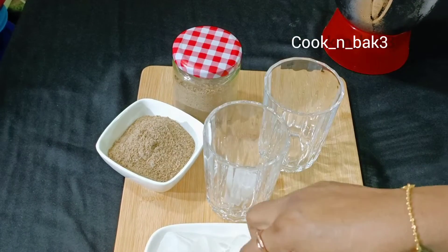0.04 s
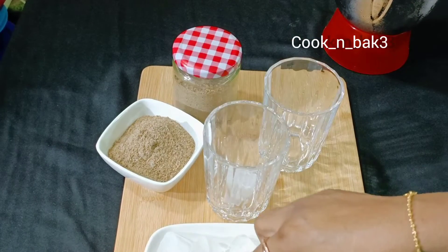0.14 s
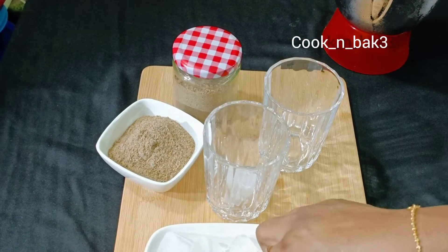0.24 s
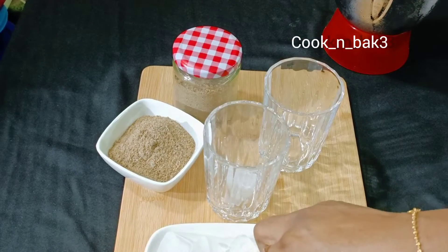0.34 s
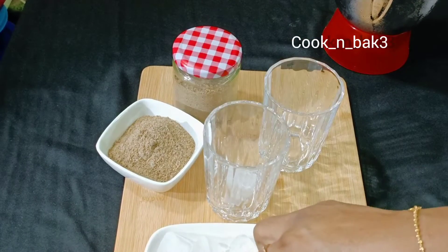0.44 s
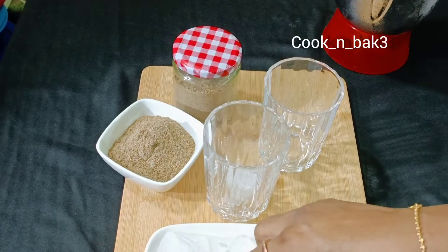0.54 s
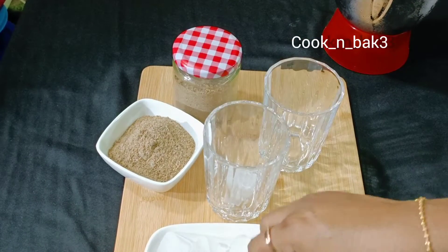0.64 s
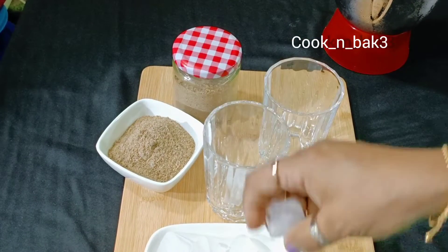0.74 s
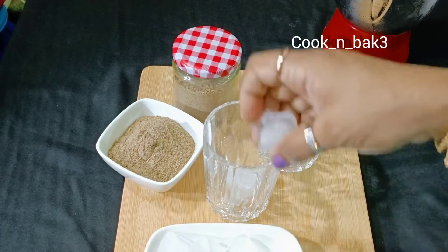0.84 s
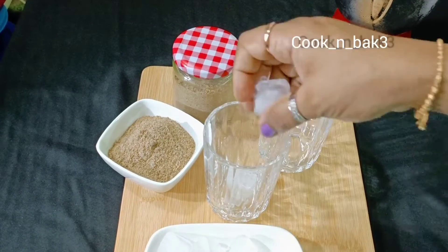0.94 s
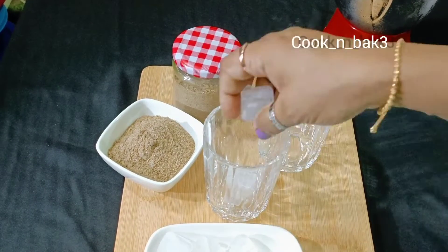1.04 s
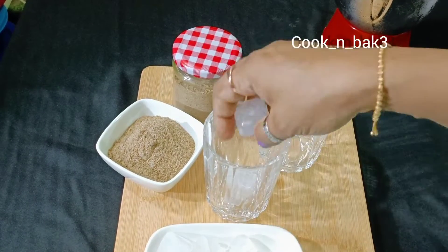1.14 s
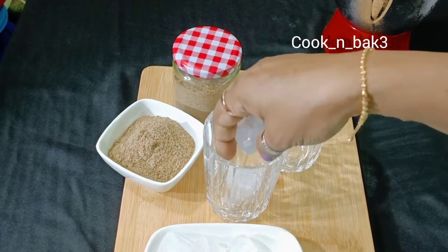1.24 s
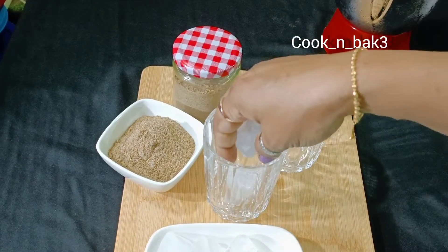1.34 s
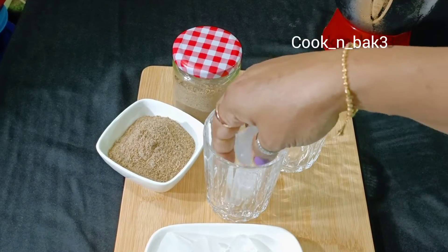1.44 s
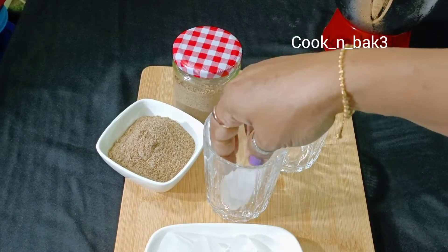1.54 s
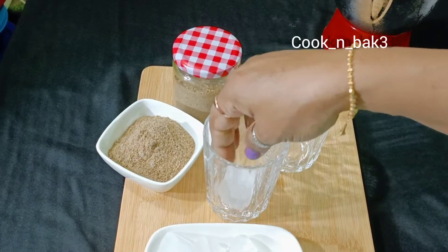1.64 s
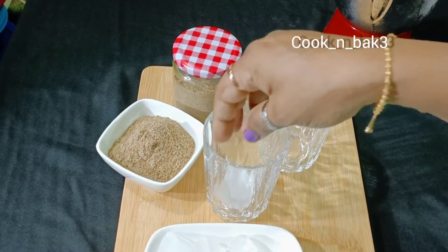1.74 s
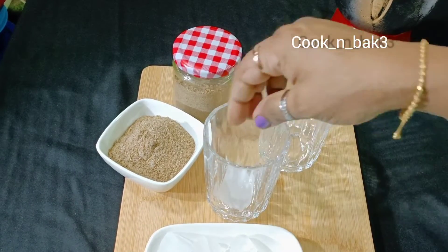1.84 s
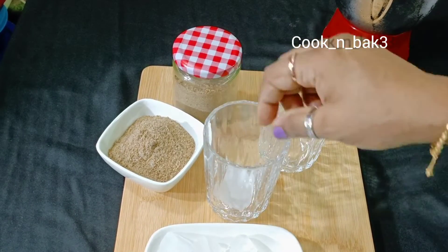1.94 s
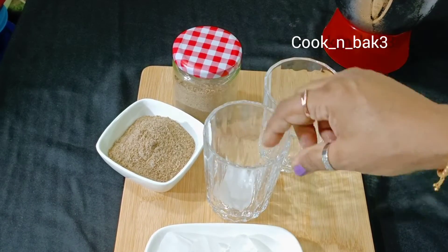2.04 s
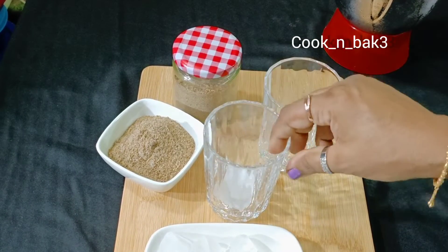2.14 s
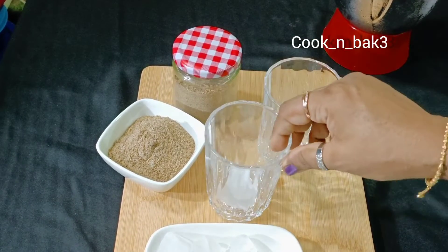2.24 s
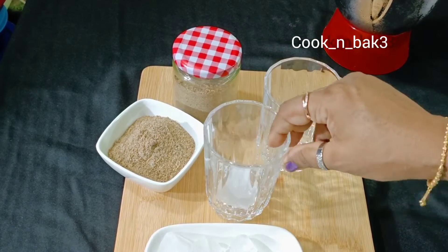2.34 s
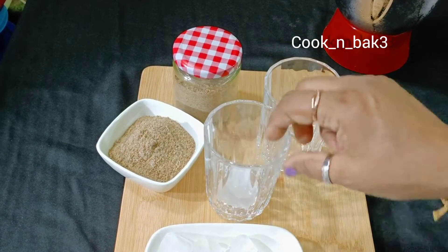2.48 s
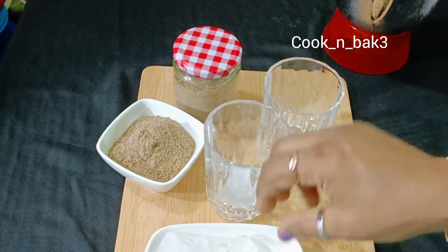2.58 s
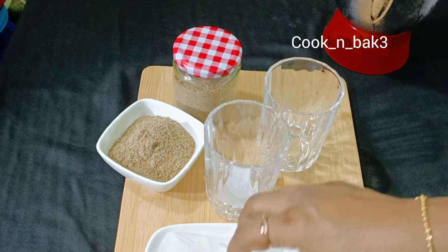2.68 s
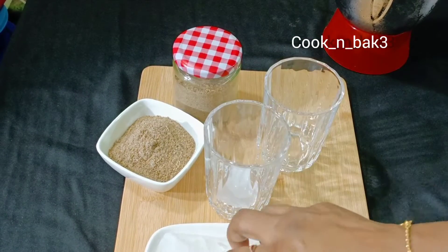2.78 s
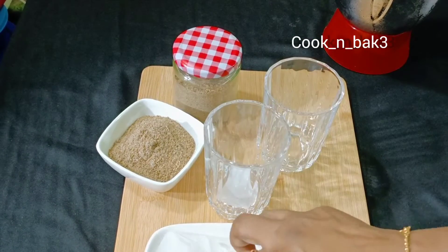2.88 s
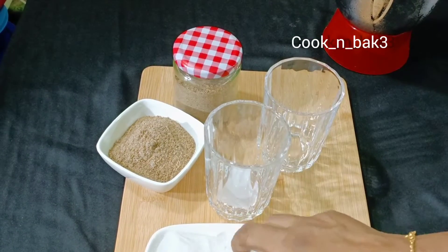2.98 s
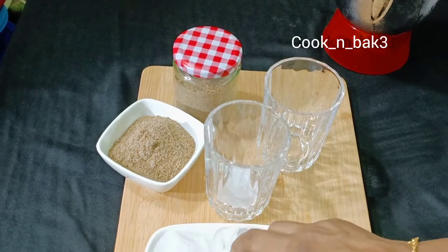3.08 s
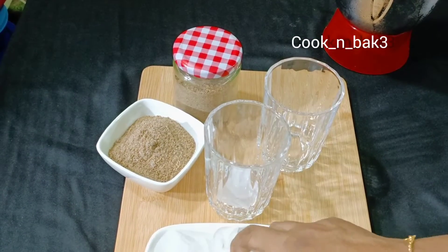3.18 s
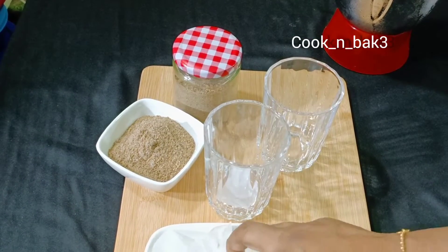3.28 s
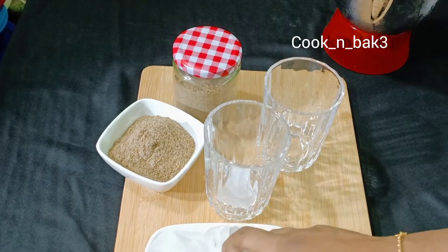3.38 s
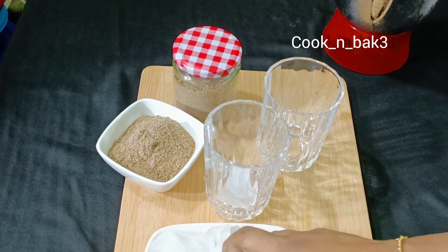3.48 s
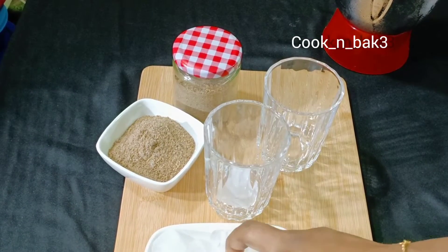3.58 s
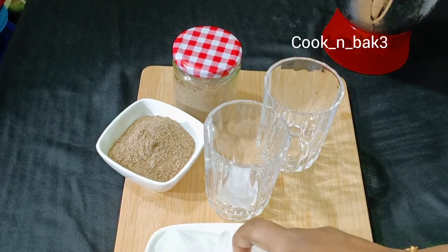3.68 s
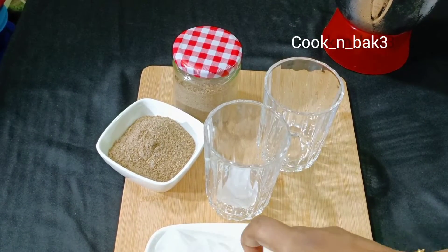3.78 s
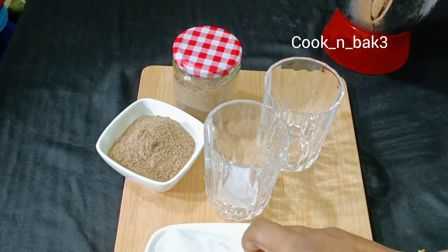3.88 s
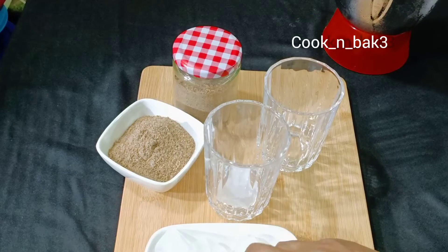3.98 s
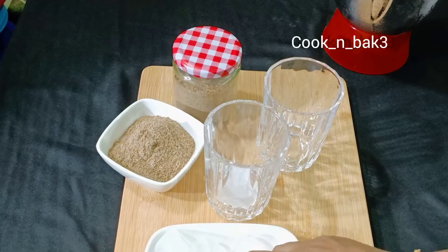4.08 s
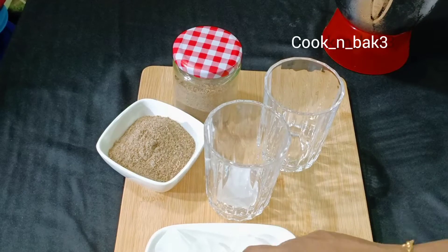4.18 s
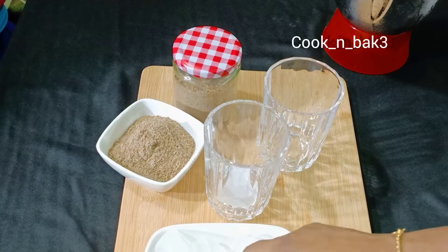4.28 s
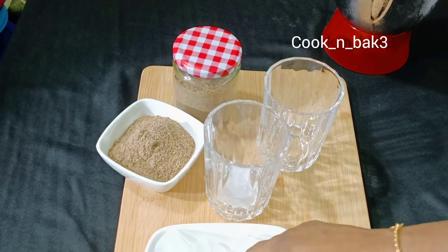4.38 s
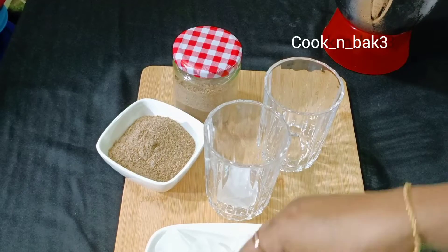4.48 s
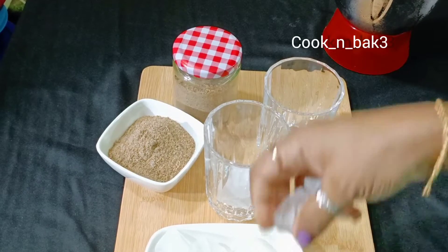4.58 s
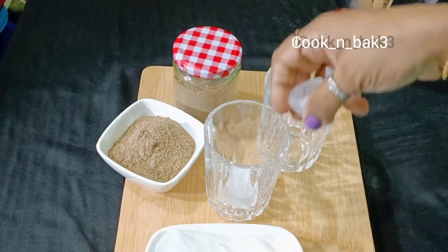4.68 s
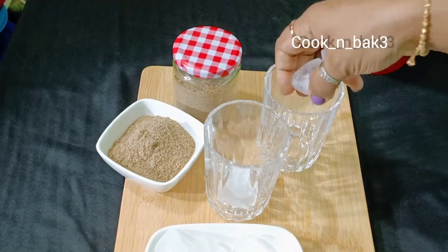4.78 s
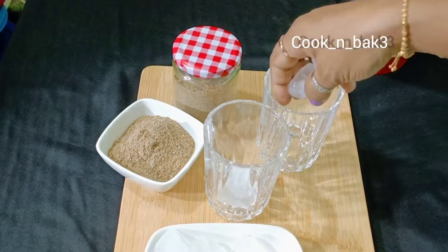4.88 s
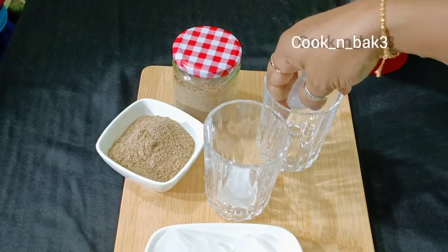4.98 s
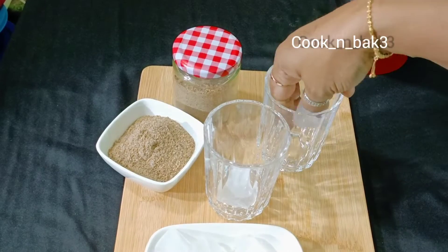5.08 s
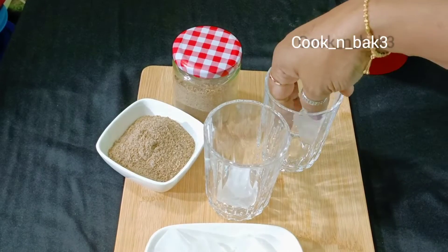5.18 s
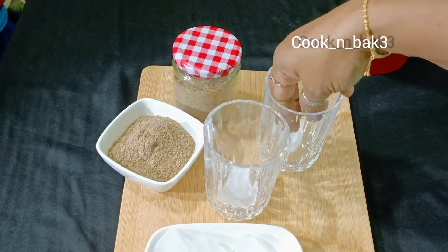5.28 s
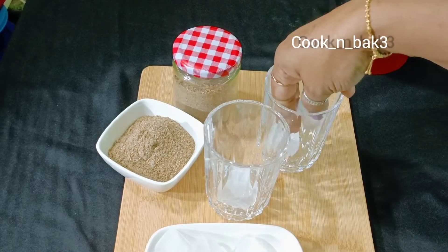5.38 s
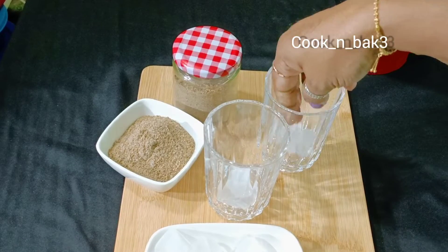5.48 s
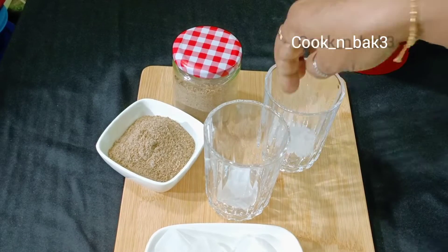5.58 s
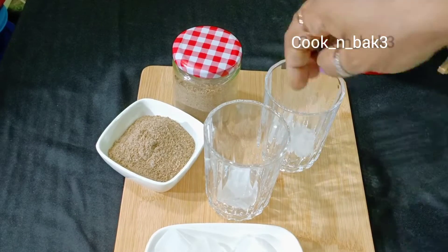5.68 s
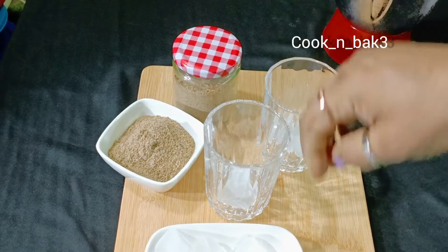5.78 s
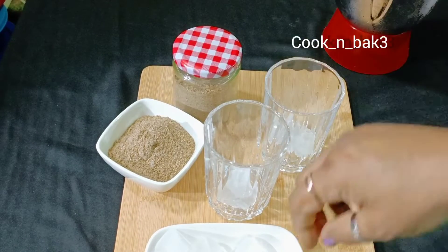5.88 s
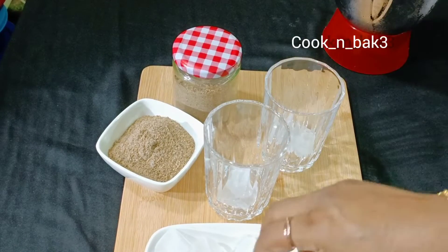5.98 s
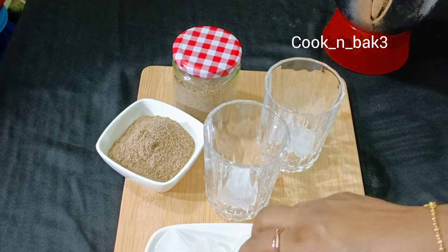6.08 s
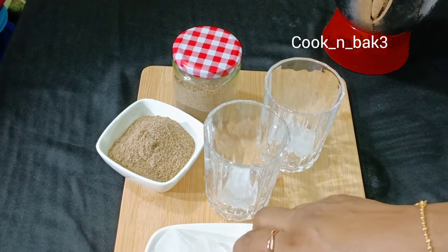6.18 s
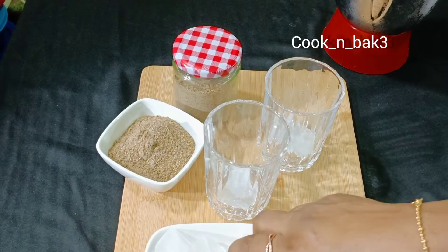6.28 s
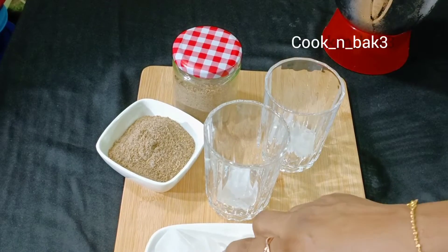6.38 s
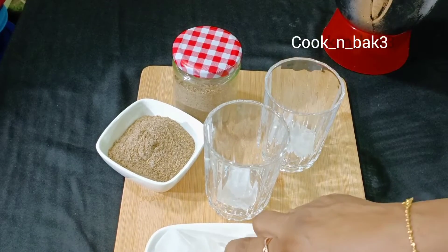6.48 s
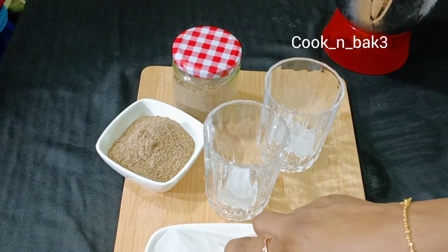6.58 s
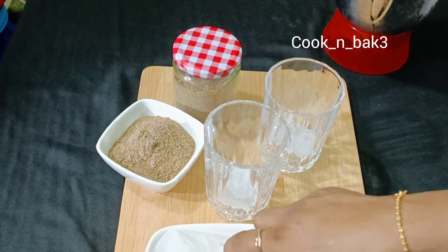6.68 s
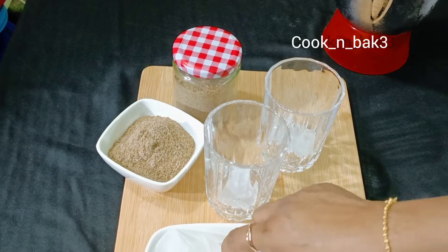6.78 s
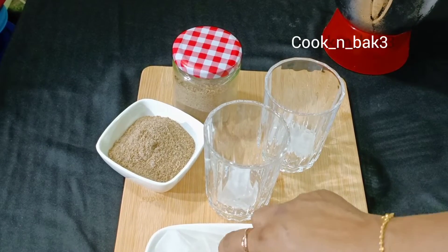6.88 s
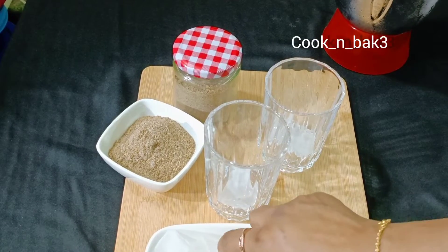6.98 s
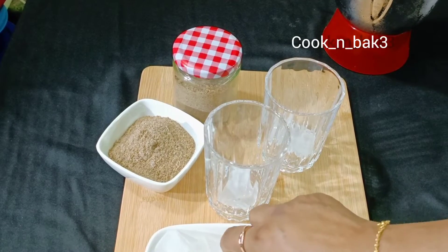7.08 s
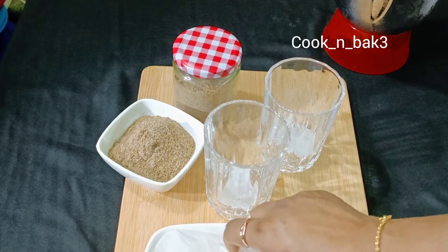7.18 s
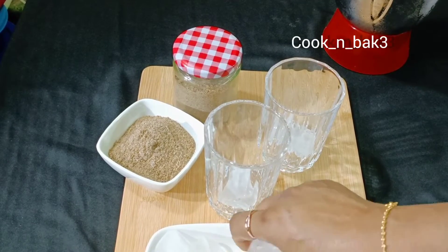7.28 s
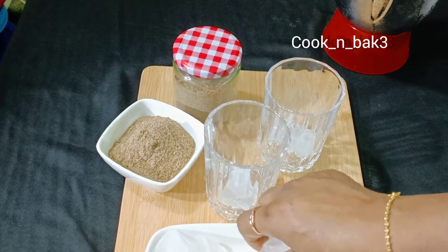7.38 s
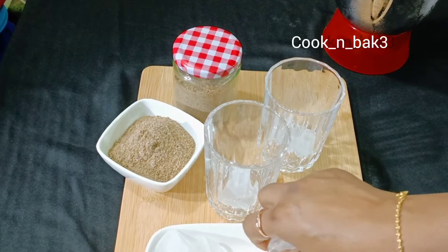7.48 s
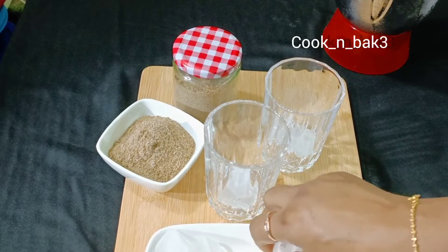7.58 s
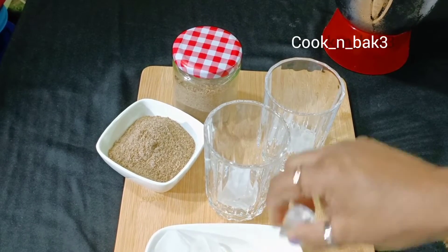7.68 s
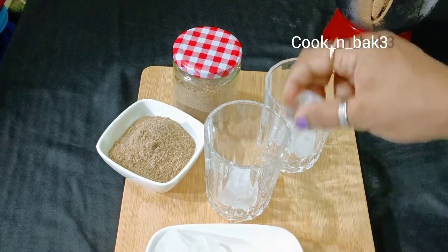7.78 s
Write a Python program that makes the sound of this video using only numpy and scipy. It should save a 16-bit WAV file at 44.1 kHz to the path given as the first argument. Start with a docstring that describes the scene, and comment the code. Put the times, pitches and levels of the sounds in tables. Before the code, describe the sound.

Close up, wet ice is picked from a dish with dry clicks, and single cubes crack and ring into glass tumblers over a faint low hum.

```python
"""A small kitchen with a low hum: ice cubes are fished out of a dish by hand and dropped into two glass
tumblers on a wooden board. Each blow cracks as a noise burst and rings decaying modes of cube, glass wall,
board and air column. In the dish the cubes click as coloured noise bursts and slide as grains and hiss
through wavering bands. Diffuse echoes follow, and two unlike microphone ports colour the near sounds."""
import sys
import numpy as np
from scipy import signal
from scipy.fft import rfft, irfft, next_fast_len
from scipy.io import wavfile
from scipy.ndimage import uniform_filter1d

SR = 44100
rng = np.random.default_rng(int(sys.argv[2]) if len(sys.argv) > 2 else 0)


def int16_out(signal):
    """Quantize to a 16-bit WAV file."""
    q = np.round(np.clip(np.atleast_2d(signal).T, -1, 1) * 32767)
    wavfile.write(sys.argv[1], SR, q.astype(np.int16))


N = 345458
SHORT, LONG = SR // 8, SR // 2   # lengths of a knock and of a wall ring, in samples
CONTACT_S, SWELL_S = 0.0018, 0.0023   # rise of a cube knock, rise of every other struck mode


def amp(db):
    """Decibels to a linear gain."""
    return 10 ** (np.asarray(db) / 20)


def rms_one(x):
    """Bring a signal to an RMS of 1."""
    return x / np.sqrt(np.mean(x ** 2) + 1e-20)


def at_hz(hz, points, column=1):
    """Read a table column at the given frequencies, straight lines over log frequency."""
    points = np.array(points)
    return np.interp(np.log(hz + 1), np.log(points[:, 0]), points[:, column])


def pan(x, db):
    """Left and right channels whose levels differ by db."""
    return x * amp([[db / 2], [-db / 2]])


def mode(hz, t60, size, rise):
    """A struck mode: a decaying sine that swells in over the moment of contact."""
    t = np.arange(size) / SR
    swell = np.sin(np.pi / 2 * np.minimum(t / rise, 1)) ** 2
    return np.sin(2 * np.pi * hz * t) * amp(-60 * t / t60) * swell


def burst(t60, noise):
    """Noise that dies away by 60 dB in t60 seconds."""
    return noise * amp(-60 * np.arange(noise.shape[-1]) / SR / t60)


def band(x, low_hz, high_hz):
    """Band-pass with gentle slopes."""
    return signal.sosfilt(signal.butter(2, [low_hz, high_hz], "band", fs=SR, output="sos"), x)


def add(out, s, x):
    """Mix a sound in at s seconds."""
    i = round(s * SR)
    out[..., i:i + x.shape[-1]] += x[..., :N - i]


def joined(curves):
    """Columns of several curves over all samples, fading to -110 dB around each."""
    padded = []
    for c in curves:
        padded.append([(c[0][0] - .05, -110, *c[0][2:]), *c, (c[-1][0] + .05, -110, *c[-1][2:])])
    s, *columns = np.concatenate(padded).T
    return [np.interp(np.arange(N) / SR, s, c) for c in columns]


def grains(per_s, spread_db):
    """Random clicks of uneven size and either sign."""
    size = amp(spread_db * np.minimum(rng.exponential(1, N), 4))
    return (rng.random(N) < per_s / SR) * size * rng.choice([-1, 1], N)


# spectrum of the hum, before it is brought to its level: f/Hz, level per Hz/dB
HUM_SPECTRUM = [(12, -40.5), (20, -12), (49, -1.5), (77, -13), (182, -10.5), (222, -16.5), (248, -15),
                (459, -17.5), (499, -20.5), (590, -22.5), (1150, -28.5), (1810, -37.5), (1960, -36),
                (5850, -54.5), (16000, -70.5)]
# level of the background, rough around the blows: t/s, level/dB
HUM_LEVEL = [(0.0, -57), (1.57, -60.5), (1.7, -55), (5.19, -61.5), (5.49, -52), (5.76, -57.5), (6.91, -60),
             (7.83, -57.5)]
# how alike the two channels are: f/Hz, likeness [0-1]
HUM_LIKENESS = [(40, 0.93), (300, .9), (700, 0.36), (2000, 0.19), (8000, .1)]
# left over right: f/Hz, L-R level/dB
HUM_BALANCE = [(40, 2), (300, -4), (1000, -1.5), (3000, -1.5), (6000, -12), (9000, 3.5)]


def hum():
    """Shaped noise at a roughly set, uneven level; the channels are most alike in the bass."""
    size = next_fast_len(N, real=True)
    hz = np.arange(size // 2 + 1) * SR / size
    mid, side = rfft(rng.standard_normal((2, size))) * amp(at_hz(hz, HUM_SPECTRUM))
    alike = at_hz(hz, HUM_LIKENESS)
    both = np.sqrt(1 + alike) * mid + np.sqrt(1 - alike) * side * [[1], [-1]]
    both = both * amp(at_hz(hz, HUM_BALANCE) * [[.5], [-.5]])
    level_db = np.interp(np.arange(N) / SR, *np.transpose(HUM_LEVEL))
    return amp(level_db) * rms_one(irfft(both, size)[:, :N])


# colour and length of the echoes: f/Hz, relative level/dB, t60/s
ROOM = [(284, -19, .25), (930, -10.5, 0.17), (3020, -17.5, 0.22), (5560, -21, 0.18), (10576, -13.5, 0.17)]


def kitchen(x):
    """Diffuse echoes after a 4 ms gap, dying band by band, different in each channel."""
    tail, white = 0, rng.standard_normal((2, 2, int(.5 * SR)))
    for k, hz in enumerate(200 * 2 ** np.arange(0, 6.5, .5)):
        t60 = at_hz(hz, ROOM, column=2)
        # neighbouring bands get unrelated noise; a longer tail is scaled down
        dying = burst(t60, white[k % 2]) / np.sqrt(t60 * SR / 14)
        tail = tail + amp(at_hz(hz, ROOM)) * band(dying, hz / 1.19, hz * 1.154)
    tail = np.pad(tail, ((0, 0), (int(.004 * SR), 0)))
    return signal.fftconvolve(x.mean(axis=0, keepdims=True), tail, axes=1)[:, :N]


# fingers on the front tumbler, one curve a stroke: t/s, level before panning/dB
STROKES = [
    [(1.1, -102), (1.316, -100.5), (1.47, -110)],
    [(2.09, -99), (2.134, -85), (2.182, -95), (2.554, -97), (2.65, -104)],
]


def stroked_wall():
    """Fingers stir the front tumbler: faint rubbing noise through its second wall mode."""
    [db], hz = joined(STROKES), FRONT_WALL[1][0]
    rub = rms_one(band(rng.standard_normal(N), hz - 25, hz + 25))
    return pan(amp(db) * rub, -6.5)


# wet ice and fingers sliding, one curve a movement: t/s, gain level/dB, centre f/Hz
SLIDES = [
    [(.05, -78, 5200), (.1, -76, 5170), (.152, -62.5, 2900), (.342, -69, 2600), (.45, -74, 3400),
     (.62, -64, 3370), (.748, -91, 3500), (.868, -73, 3310), (.958, -80, 3600)],
    [(1.85, -82, 2470), (1.938, -51.5, 3500), (2.006, -76, 4260), (2.05, -89, 2870)],
    [(2.75, -80, 2900), (2.884, -60.5, 4500), (2.984, -48.5, 3960), (3.17, -69, 3200), (3.27, -72, 2900)],
    [(3.34, -63, 2686), (3.39, -55.5, 2760), (3.442, -65, 5000), (3.51, -67.5, 4950), (3.53, -85, 3000),
     (3.592, -80, 2810)],
    [(3.722, -61.5, 3300), (3.858, -58.5, 4500), (3.962, -72, 3020), (4.018, -85, 4010), (4.082, -44, 3970),
     (4.128, -74.5, 3500), (4.4, -86, 3200)],
    [(4.776, -84, 3060), (4.89, -74.5, 3480), (5.018, -77, 3170)],
    [(6.19, -81, 4000), (6.388, -65.5, 4160), (6.514, -70, 4150), (6.7, -86, 3000)],
    [(6.85, -88, 2700), (6.934, -73, 3680), (7.06, -71.5, 2900), (7.15, -86.5, 3996), (7.19, -66, 5300),
     (7.22, -92, 5290)],
    [(7.25, -75, 4600), (7.31, -76, 4607), (7.37, -55.5, 4700), (7.458, -53, 3640), (7.494, -90, 4220)],
    [(7.69, -71, 5200), (7.72, -56, 5010), (7.83, -53.5, 4400)],
]
SLIDE_WIDTH, SLIDE_GRAINS_PER_S = .22, 1500   # width in log frequency
BROAD_DB, SLIDE_TOP_DB = -5.5, -4.5   # broad part and treble, re the centre
SQUEAK_DB = 6.5   # how far the narrow bands come and go (standard deviation)


def sliding():
    """Fine grains and hiss through narrow bands that waver and open around the moving centre."""
    db, centre_hz = joined(SLIDES)
    hiss = rng.standard_normal((3, N))
    grit = .9 * grains(SLIDE_GRAINS_PER_S, spread_db=4.0)
    rub = hiss[:2] + grit, hiss[1:] + grit
    out = amp(SLIDE_TOP_DB) * band(rub[0], 7500, 11000)
    steps = np.arange(0, N / SR + 1, .1)
    for k, hz in enumerate(np.geomspace(1300, 6300, num=24)):
        opening = amp(BROAD_DB) + np.exp(-np.log(hz / centre_hz) ** 2 / SLIDE_WIDTH ** 2)
        waver_db = np.interp(np.arange(N) / SR, steps, rng.normal(0, SQUEAK_DB, len(steps)))
        # within each channel, neighbouring bands get different hiss
        out = out + opening * amp(waver_db) * band(rub[k % 2], hz / 1.03, hz * 1.03)
    return amp(db) * out


# cube on cube or dish, long ones are wet scuffs: t/s, body peak level/dB, colour f/Hz,
# low part level/dB, treble part level/dB, L-R level/dB, t60/s
CLICKS = [(0.0933, -52.5, 3120, -69, -47.5, 5.5, .012), (0.134, -60, 5240, -33, -39, 7, 0.022),
          (.1645, -46, 2870, -48, -41, 5.5, 0.032), (0.225, -41.5, 2400, -33, -33, 12, 0.029),
          (.3377, -38, 2340, -50, -55, 6, 0.017), (0.3606, -38, 5200, -36, -29, 5, 0.017),
          (0.4595, -46, 2770, -53, -37, 1, 0.022), (.575, -58, 2420, -63, -42, 11, .043),
          (0.5912, -46, 3340, -36, -23.5, 8, 0.131), (0.613, -32.5, 3270, -37, -35, 1, 0.016),
          (0.7096, -34.5, 2760, -23, -23, 8, 0.042), (.727, -27, 4020, -54, -15, 8, 0.034),
          (0.8056, -28.5, 2873, -26, -22, -5, 0.014), (0.9337, -49.5, 4500, -36.5, -40, 5, 0.016),
          (1.9267, -51, 4011, -52.5, -53, -9, .076), (1.937, -63, 3610, -31, -45.5, -13, 0.011),
          (2.814, -42.5, 2110, -30, -26.5, -4, 0.017), (2.8645, -46.5, 3950, -50, -43, 5, .012),
          (2.8968, -50, 5910, -51, -34.5, -7, .012), (2.9166, -31.5, 3020, -52, -30, 8, 0.016),
          (2.9237, -40.5, 4094, -21, -11, -10, 0.011), (2.9637, -31, 4100, -39, -39, 2, 0.0091),
          (2.9789, -26.5, 2526, -13, -9.5, 4, 0.0049), (2.9967, -51, 3190, -51, -27, -15, 0.0076),
          (3.0088, -38, 3250, -46, -34, 1.5, 0.02), (3.0423, -38, 1943, -49, -25, 3.5, 0.014),
          (3.0576, -26.5, 2690, -45, -38, 2, 0.0073), (3.0899, -40, 2120, -19, -30, 5, 0.025),
          (3.1048, -39, 3300, -46, -46, 13, 0.014), (3.114, -47, 2750, -26, -31, -11, 0.028),
          (3.1264, -20.5, 2410, -14, -6, 2, 0.017), (3.1371, -47, 5030, -45, -34, -13, 0.0176),
          (3.1728, -36.5, 2949, -21, -45, 14, 0.014), (3.34, -50.5, 2780, -55.5, -56.5, 1, 0.08),
          (3.357, -44, 2810, -57, -49, 10, 0.01), (3.506, -50, 2960, -20.5, -47, 6, 0.017),
          (3.518, -52, 2120, -41, -56, -1, 0.013), (3.608, -68, 2292, -48, -63, 5.5, .012),
          (3.633, -65, 5019, -56, -52, 3, 0.013), (3.688, -42.5, 2800, -39.5, -42, 3, .02),
          (3.697, -35, 2830, -22, -25.5, 3.5, 0.017), (3.795, -38, 5930, -16, -9, 1, 0.012),
          (3.809, -37.5, 5600, -54, -28, 4, 0.026), (3.835, -29, 4347, -26, -25, 5, 0.0082),
          (3.9402, -72, 2040, -30.5, -52, 14, .013), (3.9555, -47.5, 3212, -36, -57.5, 5, 0.0185),
          (3.975, -43, 2905, -26, -60, 1, 0.013), (4.05, -45, 3200, -21, -55, 8, 0.0206),
          (4.058, -21, 4200, -7.5, -10.5, 2.5, 0.01), (4.0944, -33.5, 2240, -53, -19.5, 7, .017),
          (4.131, -42.5, 4460, -50, -29, -4, 0.0094), (6.2589, -37, 4600, -25.5, -27, -4, 0.017),
          (6.9348, -58.5, 3900, -41, -41, 2, 0.06573), (6.9892, -57.5, 5890, -35, -52.5, 3, 0.073),
          (7.1702, -84, 5800, -63.5, -38.5, 20, 0.08024), (7.4272, -44, 2280, -17.5, -21.5, 3, .014),
          (7.4554, -41.5, 2880, -27.5, -47, 12, 0.0157), (7.4822, -46, 4180, -52, -46, -2, 0.015),
          (7.4932, -42, 4238, -36, -33, 0.5, 0.013)]
UPPER_DB = -7   # upper mids re treble part


def dish_clicks():
    """Dry cracks and scuffs: noise bursts, each with its own colour and length."""
    out = np.zeros((2, N))
    for s, peak_db, hz, low_db, treble_db, side_db, t60 in CLICKS:
        onset = np.minimum(np.arange(4000) / (0.1 * t60 * SR + 1), 1)
        crack = burst(t60, rng.standard_normal(4000)) * onset
        crack /= np.sqrt(t60 / 0.0046)   # a longer contact spreads the same energy
        body = band(band(crack, 0.64 * hz, 1.515 * hz), 0.64 * hz, 1.515 * hz)
        low = band(crack, 1070, 2110)
        treble = amp(UPPER_DB) * band(crack, 3700, 7900) + band(crack, 6580, 19845)
        click = amp(peak_db) * body / np.abs(body).max() + amp(low_db) * low + amp(treble_db) * treble
        add(out, s, pan(click, side_db))
    return out


# heavier contacts thump the dish: t/s, level/dB
THUMPS = [(0.227, -47.5), (0.6152, -37), (.727, -44.5), (.8055, -41), (1.9254, -45.5), (2.9774, -38.5),
          (3.0436, -43), (3.0574, -35.5), (3.0922, -40.5), (3.116, -38), (3.1266, -35), (3.1368, -33.5),
          (3.1721, -39.5), (3.696, -45.5), (3.795, -42), (4.0574, -39.5), (4.0944, -41)]
DISH_HZ, DISH_T60_S = 427.4, 0.049


def dish_thumps():
    """The dull note of the dish: one short mode, its pitch a little different each time."""
    out = np.zeros((2, N))
    for s, db in THUMPS:
        hz = DISH_HZ * (1 + 0.043 * rng.standard_normal())
        add(out, s, amp(db) * mode(hz, DISH_T60_S, SHORT, SWELL_S))
    return out


# the cube skids and chatters in the tumbler between the clear blows: t/s, level/dB
RATTLE = [
    [(5.28, -73.5), (5.44, -64.5), (5.518, -30.5), (5.558, -60), (5.72, -86)],
]


def rattle():
    """Dense small contacts, broad in colour: random clicks through a wide band."""
    [db] = joined(RATTLE)
    return amp(db) * rms_one(band(grains(1200, spread_db=2.5), 1100, 12000))


# three multiples of the board note: multiple of the note, relative level/dB, t60/s
BOARD_MODES = [(.33, -15.5, 0.068), (.78, -8.5, 0.083), (1.0, 1, .09)]


def board_thump(note_hz):
    """The wooden board answers a blow with a few short modes."""
    return sum(amp(db) * mode(k * note_hz, t60, SHORT, SWELL_S) for k, db, t60 in BOARD_MODES)


AIR_T60_S = 0.089
AIR_SCATTER = 0.032   # the air notes differ by this share from blow to blow (standard deviation)
AIR_PAIR, AIR_PAIR_DB = 0.95, -3.5   # a second note lies just under the first: ratio, dB


def air_note(note_hz):
    """The air column in the tumbler sounds two close, short notes of uneven pitch and level."""
    out = 0
    for ratio, db in [(1, 0), (AIR_PAIR, AIR_PAIR_DB)]:
        pitch, level = rng.standard_normal(2)
        hz = ratio * note_hz * (1 + AIR_SCATTER * pitch)
        out = out + amp(db + 3.0 * level) * mode(hz, AIR_T60_S, SHORT, SWELL_S)
    return out


# knock of a cube, before scatter: f/Hz, relative level/dB, t60/s
CUBE_MODES = [(1630, -10, 0.014), (3324, 2.5, 0.018), (4200, -5.5, 0.016), (5312, -14, 0.03),
              (2700, -12, 0.029), (6380, -13, 0.018)]
# treble edge re crack level, front then back tumbler: level/dB
EDGE_DB = (-17.5, -3)
KNOCK_DB, CRACK_DB = -5.0, -1.5   # cube modes and broad crack, re crack level


def cube_crack(back):
    """The cube's own modes, a broad crack partly shared by the channels and a treble edge."""
    knock = 0
    for hz, db, t60 in CUBE_MODES:
        level, pitch = rng.standard_normal(2)
        knock = knock + amp(db + 3.1 * level) * mode(hz * (1 + 0.018 * pitch), t60, SHORT, CONTACT_S)
    shared, own = rng.standard_normal(800), rng.standard_normal((2, 800))
    out = np.tile(amp(KNOCK_DB) * knock, (2, 1))
    out[:, :800] += amp(CRACK_DB) * band(burst(0.019, shared + 0.53 * own), 810, 19845)
    out[:, :800] += amp(EDGE_DB[back]) * band(burst(0.01, own), 10500, 15000)
    return out


# wall modes of each tumbler, every one a close pair:
# f/Hz, split f/Hz, share of the upper [0-1], t60 when free/s, relative level/dB, L-R level/dB
FRONT_WALL = [(2448.5, 11, 0.2, 0.54, 0, -1), (5830, 29, 0.2, 0.25, 2, -7), (9664, 28, 0.36, .2, 16.5, 5),
              (10913, 20, 0.06, 0.2, 12, 4.5)]
BACK_WALL = [(2440, 18, 0.072, 0.12, 0.5, 0.0064), (5844, 27, 0.14, 0.2, -1, 0), (9900, 32, 0.37, .2, 5, 0),
             (10886, 20, .2, .25, 5, 0.016)]


def wall_ring(back, low_db, high_db, free, kept):
    """The glass wall rings in beating pairs of modes, lowered over time by the curve kept."""
    out = 0
    walls = BACK_WALL if back else FRONT_WALL
    for (hz, split, upper, t60, db, side_db), blow_db in zip(walls, (low_db, high_db, high_db, high_db)):
        lasts = t60 * max(free, .1)
        pair = (1 - upper) * mode(hz - upper * split, lasts, LONG, SWELL_S)
        pair += upper * mode(hz + (1 - upper) * split, lasts, LONG, SWELL_S)
        out = out + pan(amp(db + blow_db) * pair * kept, side_db)
    return out


# cube on tumbler: t/s, crack level/dB, low ring level/dB, high ring level/dB, board level/dB,
# air level/dB, share of free ring time [0-1]
CLINKS = [(1.5445, -25, -29.5, -34, -51.5, -49.5, 1), (1.5751, -10.5, -29, -14, -38.5, -30, 1),
          (1.5923, -23.5, -28, -41.5, -35.5, -28, 0.88), (1.6033, -24.5, -24, -43, -28.5, -39.5, 0.9),
          (1.6177, -34.5, -26, -44, -38.5, -40, 0.57), (1.6557, -26.5, -45, -44, -34.5, -60, 1),
          (1.6763, -47, -59.5, -72.5, -47, -43.5, 0.5), (2.2412, -81, -90, -95, -36.5, -75, .6),
          (2.272, -67, -62, -87, -63, -75, 0.25), (5.1417, -36, -30, -33, -47, -59, 0.2),
          (5.236, -53, -51, -56, -57, -66, 1), (5.2823, -9, -8.5, -52, -18.5, -25, 0.075),
          (5.2973, -20, -40.5, -51, -24.5, -20, 0.77), (5.3084, -19.5, -45, -56, -40, -21.5, 0.636),
          (5.3504, -19.5, -41, -52, -28.5, -52, 0.67), (5.3624, -23.5, -60.5, -65, -54, -48.5, .9),
          (5.3996, -36, -42.5, -70.5, -33, -34, 0.57), (5.4145, -32, -39.5, -62, -47, -40, .3),
          (5.4447, -27.5, -27.5, -28, -39, -42.5, 0.54), (5.4789, -16.5, -31, -39, -28.5, -32.5, 0.4),
          (5.5183, -24, -28, -20.5, -29, -33, 1), (5.531, -29, -30, -32, -34, -35, 1),
          (5.5395, -16, -12.5, -47.5, -24, -27.5, 1), (5.5528, -37, -26, -43, -33.5, -36, 0.33),
          (5.5638, -16, -31, -26, -25, -34, 0.99), (5.5819, -32, -25.5, -25.5, -42, -36, 0.56),
          (5.611, -29, -34, -34.5, -34.5, -41.5, 0.92), (5.6261, -28, -41, -54.5, -38, -39, .7),
          (5.6354, -30.5, -47, -58, -37.5, -47, .75), (5.671, -34.5, -56, -73, -42.5, -58, 0.95),
          (5.6835, -64, -52, -82.5, -66, -63, 1), (5.7221, -65, -51.5, -75, -49.5, -58, 1)]
# fingers or the leaning cube still the wall: t/s, level taken off/dB
DAMPINGS = [(1.92, 3.5), (1.969, 13), (5.271, 7.5), (5.582, 19.5), (5.636, 4.5)]
# what a contact takes off earlier ringing, front then back tumbler: level/dB (below 0 takes nothing)
MUFFLE_DB = (2, -1.5)
# front then back tumbler: board note f/Hz, air note f/Hz at first, air note f/Hz at rest,
# rise starts t/s, rise takes t/s
HOLLOW = [(300.73, 790, 960, 1.575, .03), (359.2, 790, 975, 5.42, 0.1616)]
SWAP_S = 3.0   # clinks before this are in the front tumbler, later ones in the back
AIR_LAG_S = 0.00014   # the air column reaches the left port later


def tumblers():
    """Each blow cracks, and rings wall, air column and board into separate knocks and wall rings."""
    out, rings, muffled_db = np.zeros((2, N)), np.zeros((2, N)), np.zeros(N + SR)
    # in the front tumbler each contact lowers earlier ringing; in the back only DAMPINGS do
    for s, muffle_db in [(s, MUFFLE_DB[s > SWAP_S]) for s, *_ in CLINKS] + list(DAMPINGS):
        muffled_db[round(s * SR):] += max(muffle_db, 0)
    for s, crack_db, low_db, high_db, board_db, air_db, free in CLINKS:
        back, start = s > SWAP_S, round(s * SR)
        add(out, s, amp(crack_db) * cube_crack(back))
        # only what is muffled after this blow counts, smoothed over 90 samples
        later_db = uniform_filter1d(muffled_db[start:start + LONG], size=90)
        kept = amp(muffled_db[start] - later_db)
        add(rings, s, wall_ring(back, low_db, high_db, free, kept))
        board_hz, first_hz, rest_hz, rise_s, takes_s = HOLLOW[back]
        add(out, s, amp(board_db) * board_thump(board_hz))
        # the sinking cube shortens the air column
        air_hz = np.interp(s, [rise_s, rise_s + takes_s], [first_hz, rest_hz])
        air = amp(air_db) * air_note(air_hz)
        add(out[0], s + AIR_LAG_S, air)
        add(out[1], s, air)
    return out, rings


def colour(x, db_of_hz, late_s):
    """Causal (minimum-phase) filter with the given dB response and a small delay."""
    size = 4096
    hz = np.arange(size // 2 + 1) * SR / size
    # folding the cepstrum forward gives the minimum phase
    cepstrum = irfft(np.log(amp(db_of_hz(hz))))
    cepstrum[1:size // 2] *= 2
    cepstrum[size // 2 + 1:] = 0
    response = np.exp(rfft(cepstrum) - 2j * np.pi * hz * late_s)
    return signal.oaconvolve(x, irfft(response)[:size // 2])[:N]


# the two microphone ports, for near sounds: f/Hz, left level/dB, right level/dB
PORTS = [(99.64, -6, -6.5), (370, -2.5, 0), (1060, -2, -5), (2304.7, -2.5, 4), (4860, -5, 4),
         (6000, -13, 9.5), (6606, -17.5, -4), (6897, -31.5, -20), (7270, -11.5, -33), (10700, -28.5, -40.5),
         (13846, -41.5, -44.5), (16130, -39.5, -38.5)]
LEFT_LEAD_S = .00005


def ports(near):
    """Each port colours the near sounds in its own way; the left one hears them a little earlier."""
    return np.array([colour(near[k], lambda hz: at_hz(hz, PORTS, column=k + 1), k * LEFT_LEAD_S)
                     for k in range(2)])


ROOM_DB, RING_ROOM_DB = 12, -3   # echo level; the long wall ringing sends less


def scene():
    """Ice, glass and echoes through the ports, over the hum."""
    knocks, rings = tumblers()
    blows = knocks + rattle() + dish_clicks() + dish_thumps()
    echoes = amp(ROOM_DB) * kitchen(blows + amp(RING_ROOM_DB) * rings)
    near = blows + rings + echoes + sliding() + stroked_wall()
    return ports(near) + hum()


PEAK_LIMIT, CUTOFF_HZ = .86, 15800   # level the rounded peaks stay under (full scale 1); top cut


def record(dry):
    """Rumble is cut, the highest peaks are rounded, the top is cut."""
    dry = signal.sosfilt(signal.butter(4, 33, "high", fs=SR, output="sos"), dry)
    dry = dry / (1 + (dry / PEAK_LIMIT) ** 8) ** .125
    return signal.sosfilt(signal.cheby2(12, 70, CUTOFF_HZ, fs=SR, output="sos"), dry)


dry = scene()
out = record(dry)
int16_out(out)
```